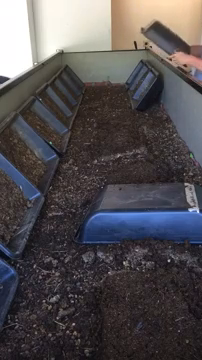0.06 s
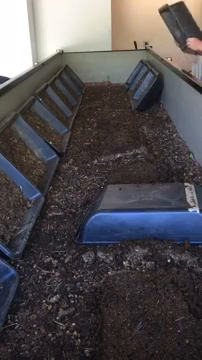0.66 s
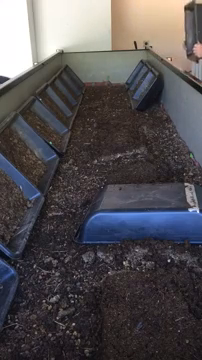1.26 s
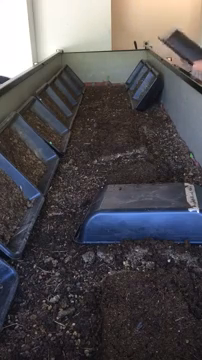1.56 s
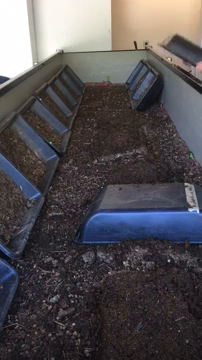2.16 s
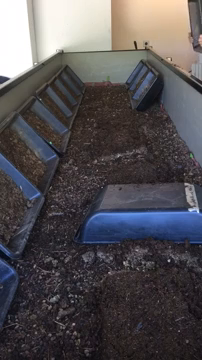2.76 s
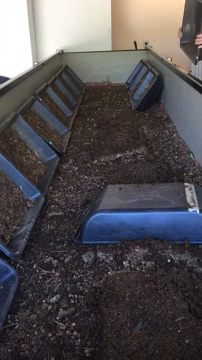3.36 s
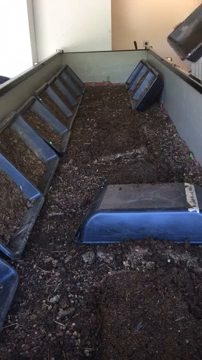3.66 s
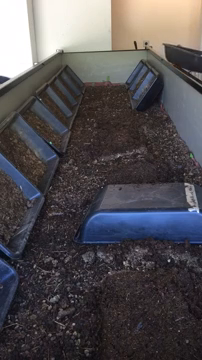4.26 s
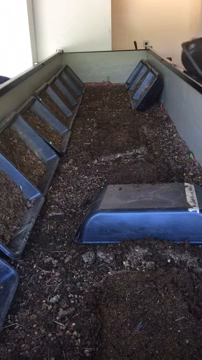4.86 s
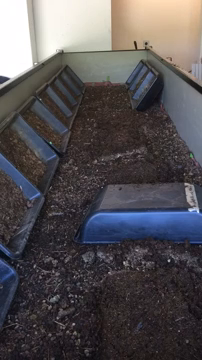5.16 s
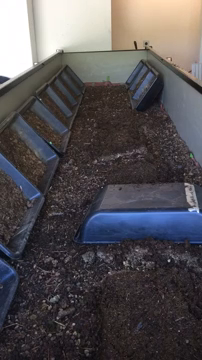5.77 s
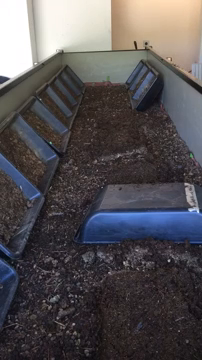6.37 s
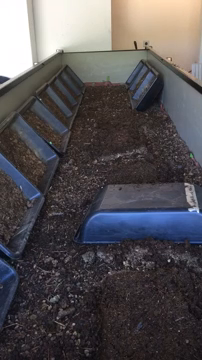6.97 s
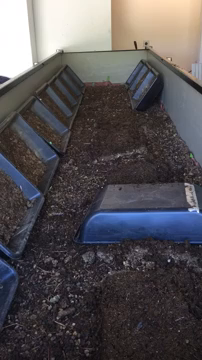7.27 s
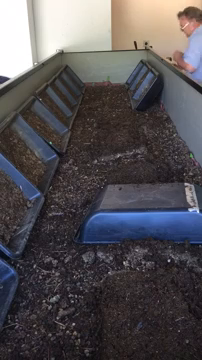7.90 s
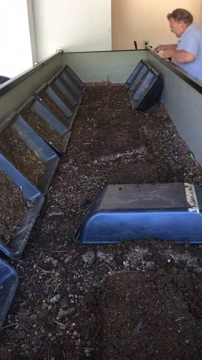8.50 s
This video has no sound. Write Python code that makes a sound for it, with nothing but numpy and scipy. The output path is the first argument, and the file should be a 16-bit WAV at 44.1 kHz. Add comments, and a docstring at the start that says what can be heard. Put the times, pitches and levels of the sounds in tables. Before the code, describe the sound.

Still air and a faint low hum run throughout, heard from beside a big wooden compost bin near hard walls. From the start, soil slides softly out of a plastic tray, a gritty rustle with single crumbs ticking close to the microphone. At about 1.5 and 2.2 seconds the tray is knocked hard on the bin's rim: the wood booms, the plastic cracks, and the walls ring briefly. Faint scuffs and trickles continue. Near 3.9 seconds the tray bumps the rim with a lighter double thud and click, then rubs quietly as it is carried off. At about 6.5 seconds it drops onto other trays with a loud, hollow clatter of quick booms and clacks, rocking to rest by 7.2 seconds. A small scuff comes near 7.8 seconds, a soft low bump just after 8, and a last faint scuff around 8.6.

```python
"""A plastic tray is knocked twice on the rim of a big wooden compost bin, beside hard walls that ring on.
The wood booms and the plastic cracks. Soil slides out as a rustle of tiny impacts, with a few crumbs
landing near the microphone. The tray bumps the rim, is carried off and is dropped on other trays, where
its panels, rim and floor clatter and it rocks to rest. Small scuffs and bumps of handling follow;
still air and a faint low hum lie under it all."""
import sys
import numpy as np
from scipy import signal
from scipy.fft import rfft, irfft
from scipy.io import wavfile

SR = 44100
rng = np.random.default_rng(int(sys.argv[2]) if len(sys.argv) > 2 else 0)


def int16_out(signal):
    """Quantize to a 16-bit WAV file."""
    q = np.round(np.clip(np.atleast_2d(signal).T, -1, 1) * 32767)
    wavfile.write(sys.argv[1], SR, q.astype(np.int16))


N = 380918
TIME = np.arange(N) / SR
AGE = TIME[:SR]   # seconds since a blow

# spectrum of the tray's hard edges: (frequency [Hz], relative density [dB])
EDGE_SPECTRUM = [(1500, -16.5), (3500, -6.5), (5800, 1.5), (7500, -7), (10000, -12), (12000, -14),
                 (17000, -26)]


def from_db(db):
    """Decibels to gain."""
    return 10 ** (np.asarray(db) / 20)


def unit_rms(x):
    """Scale to an rms of 1."""
    return x / np.sqrt(np.mean(x ** 2) + 1e-20)


def decay(t60):
    """Envelope that falls 60 dB in t60 seconds."""
    return np.exp(-np.log(1000) * AGE / t60)


def rise(swell):
    """Envelope that climbs to 1 in swell seconds."""
    return np.minimum(AGE / swell, 1)


def add(track, s, sound):
    """Mix a sound into the track at s seconds."""
    start = int(s * SR)
    track[start:start + len(sound)] += sound[:len(track) - start]


def drift(per_s):
    """A wandering curve through per_s random values a second, each with a spread of 1."""
    knots = rng.standard_normal(2000)
    return np.interp(TIME * per_s, np.arange(len(knots)), knots)


def coloured(x, spectrum, size=4096):
    """Causal (minimum-phase) filter with this spectrum's shape; white noise keeps its power."""
    hz, db = np.transpose(spectrum)
    grid_hz = np.fft.rfftfreq(size, 1 / SR) + 1
    gain = unit_rms(from_db(np.interp(np.log(grid_hz), np.log(hz), db)))
    cepstrum = irfft(np.log(gain))
    cepstrum[1:size // 2] *= 2
    cepstrum[size // 2 + 1:] = 0
    return signal.fftconvolve(x, irfft(np.exp(rfft(cepstrum))))[:len(x)]


def hump_db(hz, centre_hz, octaves, depth_db):
    """The place and hardness of a touch favour one pitch: 0 dB there, down to -depth_db far from it."""
    return depth_db * (np.exp(-.5 * (np.log2(hz / centre_hz) / octaves) ** 2) - 1)


def humped(spectrum, centre_hz, octaves, depth_db):
    """A spectrum with a hump around centre_hz."""
    hz = np.geomspace(100, SR / 2, 60)
    points_hz, db = np.transpose(spectrum)
    plain_db = np.interp(np.log(hz), np.log(points_hz), db)
    return np.c_[hz, plain_db + hump_db(hz, centre_hz, octaves, depth_db)]


def mode(hz, db, t60, swell):
    """One resonance: a sine that builds up for swell seconds and dies away."""
    return from_db(db) * np.sin(2 * np.pi * hz * AGE) * decay(t60) * rise(swell)


def ringing(modes, strengths_db, swell):
    """Blows on one set of modes; strengths_db has a row for each blow and a column for each mode."""
    rings = np.array([(-1) ** k * mode(*row, swell) for k, row in enumerate(modes)])
    return from_db(strengths_db) @ rings


def burst(own_t60, room_db, room_t60, swell, spiky_db):
    """Crowded modes as noise: an uneven quick ring of the object, then a smooth tail between the walls."""
    near, far, lumps = rng.standard_normal((3, len(AGE)))
    own = unit_rms(near * from_db(spiky_db * np.clip(lumps, -2, 2))) * decay(own_t60)
    room = from_db(room_db) * far * decay(room_t60) * rise(0.019)
    return (own + room) * rise(swell)


def reflected(x):
    """Nearby boards send delayed copies to the microphone, which comb the sound; its power is kept."""
    # early reflections: (delay [s], level against the direct sound [dB])
    reflections = [(.0021, -21.5), (.0047, -20), (.0069, -16.5)]
    out = x.copy()
    for delay, db in reflections:
        add(out, delay, from_db(db) * x)
    return out / np.sqrt(1 + sum(from_db(db) ** 2 for _, db in reflections))


def background(hum_hz=58.6, hum_db=-61, air_db=-61.5):
    """The ambience of the place: still air and a low hum that wavers in pitch and level."""
    # still air: (frequency [Hz], relative density [dB])
    air_spectrum = [(15, -40.5), (25, -12), (48, -11), (74, 2), (174, -9.5), (334, -10.5), (464, -19),
                    (593, -17.5), (1380, -22.5), (4840, -38), (5860, -36), (8830, -37.5), (15700, -48),
                    (17000, -50.5)]
    phase = 2 * np.pi * np.cumsum(hum_hz + 2 * drift(9)) / SR
    hum = from_db(hum_db + 2.6 * drift(6)) * np.sqrt(2) * np.sin(phase)
    return hum + from_db(air_db) * coloured(rng.standard_normal(N), air_spectrum)


def grains(spectrum, per_s, size_db, wash_db):
    """Crumbs of random size tick at random, in a wash of noise that stands for their echoes; rms 1."""
    sizes = from_db(size_db * np.minimum(rng.exponential(1, N), 5)) * rng.choice([-1, 1], N)
    ticks = unit_rms(sizes * (rng.random(N) < per_s / SR))
    wash = from_db(wash_db) * rng.standard_normal(N)
    return unit_rms(coloured(ticks + wash, spectrum))


def soil_flow(attack_s=0.074, release_s=0.095, rubbing_grit_db=-7.5):
    """Gains of rustle and grit: each slide gathers, holds and runs out, on top of steady rubbing."""
    # faint rubbing of the carried tray: (time [s], level [dB])
    rubbing = [(0, -67.5), (.75, -73), (2.0, -69), (3.2, -71), (3.6, -63), (4.7, -63.5), (5.5, -59),
               (5.9, -68), (6.45, -80), (7.5, -68.5), (8.64, -77.5)]
    # soil slides as the tray tips: (time of full flow [s], hold [s], rustle level [dB], grit level [dB])
    slides = [(.10, 0.078, -64, -70.5), (.33, 0.088, -65.5, -75), (.97, 0.041, -55.5, -63),
              (1.39, 0.029, -70.5, -77), (1.76, 0.16, -61.5, -64), (2.02, 0.26, -68.5, -74),
              (2.38, .2, -65.5, -67), (2.68, 0.0042, -65, -69.5), (2.79, 0.022, -66, -71),
              (3.36, .14, -67, -62.5), (3.84, 0.11, -60.5, -62), (4.37, 0.057, -66, -66),
              (4.95, 0.05, -66, -63.5), (5.19, 0.21, -70.5, -68), (5.37, 0.2, -66, -61.5),
              (5.82, 0.027, -60.5, -67.5), (6.08, 0.13, -57.5, -67.5), (6.135, 0.012, -61, -54.5),
              (7.82, .05, -67.5, -68.5)]
    rubbing_db = np.interp(TIME, *np.transpose(rubbing))
    power = from_db([rubbing_db, rubbing_db + rubbing_grit_db]) ** 2
    for s, hold, rustle_db, grit_db in slides:
        shape = np.interp(TIME, [s - attack_s, s, s + hold, s + hold + release_s], [0, 1, 1, 0])
        power += (from_db([[rustle_db], [grit_db]]) * shape) ** 2
    return np.sqrt(power)


def soil():
    """Soil rubs and slides over plastic: a coarse rustle, the hiss of fine grit and single crumbs."""
    # coarse soil and fine grit: (frequency [Hz], relative density [dB])
    rustle_spectrum = [(150, -13), (350, -0.5), (700, -0.5), (930, -3), (1130, 2), (1330, -1.5),
                       (1600, -0.5), (2000, -3.5), (3500, -7.5), (6000, -28), (12000, -36)]
    grit_spectrum = [(1500, -15), (3500, -5), (6000, 2), (8000, -4), (10500, -7.5), (13000, -5.5),
                     (17000, -10.5)]
    # crumbs landing near the microphone: (time [s], relative level [dB])
    crumbs = [(0.3147, -59), (0.8869, -55), (1.1701, -48.5), (1.3882, -55), (1.697, -52.5), (1.7454, -52),
              (1.8795, -52.5), (1.982, -53), (2.05, -54.5), (2.387, -54)]
    coarse, fine = soil_flow()
    flicker = from_db(0.71 * drift(40))
    rustle = coarse * flicker * grains(rustle_spectrum, per_s=760, size_db=3, wash_db=3)
    grit = fine * grains(grit_spectrum, per_s=2000, size_db=3, wash_db=4.5)
    out = reflected(rustle + grit)
    treble = signal.butter(2, 4500, "high", fs=SR, output="sos")
    for s, db in crumbs:
        tick = burst(own_t60=0.01, room_db=-19.5, room_t60=.2, swell=0.00016, spiky_db=17)
        add(out, s, from_db(db + 2) * signal.sosfilt(treble, tick))
    return out


def scuffs():
    """A short drag of plastic is a run of tiny slips that swells and dies away between the walls."""
    # drags: (time [s], relative level [dB], favoured pitch [Hz], swell [s])
    drags = [(.848, -56.5, 496, 0.007), (0.939, -59.5, 1517, 0.026), (1.169, -68, 10000, .001),
             (1.18, -61.5, 399, 0.0052), (2.953, -49.5, 640, 0.02), (2.958, -49.5, 2080, 0.036),
             (3.47, -54, 1094, 0.0048), (3.958, -44.5, 6000, 0.0045), (5.025, -53.5, 370, 0.0075),
             (5.305, -46.5, 724, 0.03), (6.203, -54, 1004, 0.0047), (6.856, -38, 2630, 0.007),
             (7.848, -44.5, 2300, 0.0245), (7.85, -55, 6650, 0.0048), (8.141, -67.5, 4440, 0.011),
             (8.617, -52.5, 2640, 0.008)]
    # slipping plastic: (frequency [Hz], relative density [dB])
    slip_spectrum = [(150, -18), (400, 7), (3000, 0.5), (6000, -5.5), (10000, -11.5), (17000, -14.5)]
    out = np.zeros(N)
    for s, db, hz, swell in drags:
        slips = burst(own_t60=0.201, room_db=-5, room_t60=0.48, swell=swell, spiky_db=-1)
        spectrum = humped(slip_spectrum, hz, octaves=0.65, depth_db=14.5)
        add(out, s, from_db(db + 2.5) * coloured(slips, spectrum))
    return reflected(out)


def bin_bumps():
    """A soft push only sets the low modes of the bin's wall going."""
    # pushes: (time [s], level [dB], favoured pitch [Hz], spread [octaves])
    pushes = [(3.891, -24, 74.4, 0.81), (3.96, -33, 200, 1.06), (8.062, -41, 196, 0.52),
              (8.074, -29.5, 79.5, 0.24)]
    # the bin's wall swaying: (frequency [Hz], relative level [dB], t60 [s])
    wall_modes = [(49.9, 0.5, 0.94), (66.3, 1.5, 0.16), (83.7, -6, 0.48), (105.4, 0, 0.51),
                  (135.7, -1.5, 0.66), (179.5, -5.5, 0.26), (215, -1.5, 0.37)]
    mode_hz = np.array(wall_modes)[:, 0]
    out = np.zeros(N)
    for s, db, hz, octaves in pushes:
        strengths_db = db + hump_db(mode_hz, hz, octaves, depth_db=23)
        add(out, s, ringing(wall_modes, strengths_db, swell=0.0075))
    return out


def snap():
    """Hard plastic meets a hard edge: a crack of a few milliseconds with a faint tail."""
    return burst(own_t60=.007, room_db=-28, room_t60=.2, swell=.0003, spiky_db=2)


def corner_snaps():
    """A corner of the tray cracks sharply as it hits."""
    # corner hits: (time [s], level [dB])
    corner_hits = [(3.8908, -32.5), (3.958, -25.5), (6.562, -29), (6.7955, -34), (6.858, -43.5)]
    out = np.zeros(N)
    for s, db in corner_hits:
        add(out, s, from_db(db) * snap())
    return coloured(out, EDGE_SPECTRUM)


def tray_touches(rock_start_s=6.992, rock_gap_s=.087, rock_loss_db=7, rock_hz=880):
    """All touches of the tray; after the drop it rocks to rest in three even, ever weaker ones."""
    # tray on bin or other trays: (time [s], panel level [dB], rim level [dB], clack pitch [Hz])
    contacts = [(1.936, -65, -70, 2010), (3.891, -37, -34.5, 940), (3.958, -32.5, -41.5, 2600),
                (4.186, -48, -51, 600), (4.774, -59, -43, 3070), (5.037, -50, -58, 513),
                (6.529, -19, -23, 950), (6.546, -17.5, -20.5, 1320), (6.558, -16.5, -17.5, 1680),
                (6.563, -24, -19, 2420), (6.592, -21.5, -43, 1200), (6.682, -23.5, -32.5, 1500),
                (6.711, -22.5, -28.5, 1170), (6.763, -25, -27, 850), (6.793, -15, -24, 1100),
                (6.822, -40, -26.5, 1170), (6.855, -23, -26, 2500), (6.885, -30.5, -28.5, 1340),
                (6.922, -27, -41, 1260), (8.067, -50, -55.5, 596)]
    rocking = []
    for k in range(3):
        db = -36 - k * rock_loss_db
        rocking.append((rock_start_s + k * rock_gap_s, db, db, rock_hz))
    return np.array(contacts + rocking)


def floor_booms():
    """The tray comes down flat and its floor booms."""
    # flat landings: (time [s], level [dB])
    landings = [(4.185, -50.5), (6.548, -30), (6.557, -8), (6.623, -13.5), (6.682, -18), (6.793, -23),
                (6.885, -23)]
    # the tray's floor: (frequency [Hz], relative level [dB], t60 [s])
    floor_modes = [(54.2, -15.5, .6), (73.2, -12, 0.72), (106.9, 6.5, 0.1), (125.6, 1.5, 0.49)]
    boom = sum(mode(*row, swell=0.013) for row in floor_modes)
    out = np.zeros(N)
    for s, db in landings:
        add(out, s, from_db(db) * boom)
    return out


def tray_clatter():
    """Each touch rings the tray's side panels, clacks its stiff rim and clicks its edges."""
    # distinct resonances of panels and rim: (frequency [Hz], relative level [dB], t60 [s])
    panel_modes = [(264.6, 2.5, 0.24), (286, -10, 0.29), (322, -16, 0.21), (381.7, -10, 0.68),
                   (413, -12, .3), (512, -9.5, 0.45), (590, -8, 0.29)]
    rim_modes = [(722, -17.5, 0.21), (867, -14, 0.24), (1120, -5.5, 0.079), (1360, -18.5, .25),
                 (1600, -13, 0.36), (1716, -9.5, 0.37), (2000, -19.5, 0.41), (1996, -17, 0.23),
                 (2109, -21, 0.33), (2550, -13.5, 0.14), (2660, -24.5, .25)]
    # their crowded modes: (frequency [Hz], relative density [dB])
    panel_spectrum = [(130, -22.5), (190, -6), (250, 4), (340, 4), (480, -8), (680, -9.5), (1000, -17.5),
                      (2500, -53)]
    rim_spectrum = [(250, -13.5), (550, 7.5), (800, 3), (1400, 2), (2100, -1), (2700, -4), (3500, -9.5),
                    (5500, -20.5), (9000, -34), (16000, -49)]
    touches = tray_touches()
    panel_strengths_db = rng.normal(-4, 1.6, (len(touches), len(panel_modes)))
    panel_rings = ringing(panel_modes, panel_strengths_db, swell=0.0017)
    rim_strengths_db = hump_db(np.array(rim_modes)[:, 0], touches[:, -1:], octaves=0.97, depth_db=7)
    rim_rings = ringing(rim_modes, rng.normal(rim_strengths_db, 2.5), swell=.002)
    out, panels, edges = np.zeros((3, N))
    for (s, panel_db, rim_db, clack_hz), panel_ring, rim_ring in zip(touches, panel_rings, rim_rings):
        clack = burst(own_t60=0.11, room_db=-8, room_t60=.6, swell=0.002, spiky_db=9)
        rattle = burst(own_t60=0.34, room_db=-4, room_t60=0.51, swell=0.0033, spiky_db=6)
        click = burst(own_t60=0.11, room_db=-8, room_t60=0.37, swell=0.0052, spiky_db=13)
        clack_spectrum = humped(rim_spectrum, clack_hz, octaves=1, depth_db=7)
        rim = rim_ring + from_db(2) * reflected(coloured(clack, clack_spectrum))
        add(out, s, from_db(panel_db) * panel_ring + from_db(rim_db) * rim)
        add(panels, s, from_db(panel_db - 1.5) * rattle)
        add(edges, s, from_db(rim_db - 11.5) * click)
    return out + coloured(panels, panel_spectrum) + reflected(coloured(edges, EDGE_SPECTRUM))


def wood_boom():
    """One blow on the bin's rim: the wood rings, and the thud of its boards comes back off the walls."""
    # bin and tray ringing together: (frequency [Hz], level [dB], t60 [s], swell [s])
    bin_modes = [(46, -17.5, 0.55, 0.1), (59.2, -22.5, .5, 0.0098), (111.8, -25.5, 0.58, 0.008),
                 (126.9, -25.5, 0.34, 0.0044), (172.5, -12, 0.21, 0.016), (231.4, -17.5, 0.46, 0.05),
                 (287.3, -22.5, 0.46, 0.0023), (309.3, -16.5, 0.32, 0.014), (351, -19, 0.51, 0.018),
                 (394, -18, 0.069, 0.012), (420.5, -18, .25, 0.016), (485, -19.5, 0.34, 0.018),
                 (487.7, -6.5, 0.18, 0.002583), (506, -24, .35, 0.0071), (564, -23.5, 0.3, .02),
                 (649, -23.5, 0.4, .005), (721, -32, 0.24, 0.0046), (840, -20.5, 0.083, 0.00405),
                 (882, -31.5, 0.27, 0.0036), (1031, -24.5, .28, 0.0023), (1108, -33.5, 0.16, 0.0056)]
    # crowded higher modes of the wood: (frequency [Hz], relative density [dB])
    wood_spectrum = [(100, -15.5), (250, 1), (550, 5), (800, 0.5), (1200, -3.5), (1700, -3.5),
                     (2300, -12.5), (4000, -16.5), (8000, -37), (16000, -46)]
    # the thud's paths to the microphone: (delay [s], relative level [dB])
    thud_paths = [(.0055, -12), (0.022, -1.5), (0.0493, -4.5)]
    wood = sum((-1) ** k * mode(*row) for k, row in enumerate(bin_modes))
    crowded = burst(own_t60=0.1905, room_db=-5, room_t60=0.48, swell=0.0022, spiky_db=4.5)
    wood += from_db(-15) * reflected(coloured(crowded, wood_spectrum))
    for delay, db in thud_paths:
        add(wood, delay, mode(hz=303, db=db + 4.5, t60=.009, swell=.0005))
    return wood


def bin_knocks(crack_delay_s=0.006):
    """The tray hits the same spot each time: the wood booms, the plastic buzzes and then cracks."""
    # tray struck on the bin: (time [s], wood level [dB], relative plastic level [dB])
    blows = [(1.5154, 1, -1.5), (2.175, 0.5, -5)]
    # the plastic's crack, and the boom as the walls return it: (frequency [Hz], relative density [dB])
    crack_spectrum = [(900, -24), (2200, -3.5), (3500, -6.5), (5800, -1.5), (7500, -13.5), (10000, -14.5),
                      (12000, -20), (17000, -29)]
    tail_spectrum = [(40, -9.5), (120, -1), (185, -7), (280, 4), (480, -4.5), (700, -13), (1200, -23.5),
                     (2500, -60)]
    boom = wood_boom()
    wood, plastic, tails = np.zeros((3, N))
    for s, wood_db, plastic_db in blows:
        buzz = reflected(burst(own_t60=.17, room_db=-12, room_t60=.42, swell=.007, spiky_db=9))
        tail = rng.standard_normal(len(AGE)) * decay(t60=0.6) * rise(0.042)
        add(wood, s, from_db(wood_db) * boom)
        add(tails, s, from_db(wood_db - 18.5) * tail)
        add(plastic, s, from_db(plastic_db - 27) * buzz)
        add(plastic, s + crack_delay_s, from_db(plastic_db - 23.5) * snap())
    return wood + coloured(plastic, crack_spectrum) + coloured(tails, tail_spectrum)


def scene():
    """All sources at one microphone by the bin."""
    impacts = bin_knocks() + bin_bumps() + floor_booms() + tray_clatter() + corner_snaps()
    return (impacts + scuffs() + soil() + background())[None]


def record(dry):
    """The microphone drops the deepest bass, overloads at full scale and cuts the top."""
    low_cut = signal.butter(3, 35, "high", fs=SR, output="sos")
    high_cut = signal.ellip(10, .1, 80, 17300, fs=SR, output="sos")
    clipped = np.clip(signal.sosfilt(low_cut, dry), -1, 1)
    return signal.sosfilt(high_cut, clipped)


dry = scene()
out = record(dry)
int16_out(out)
```